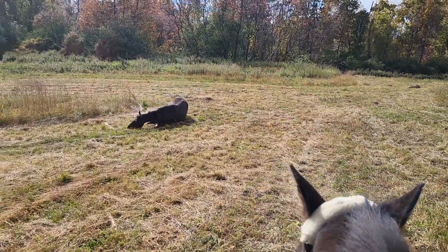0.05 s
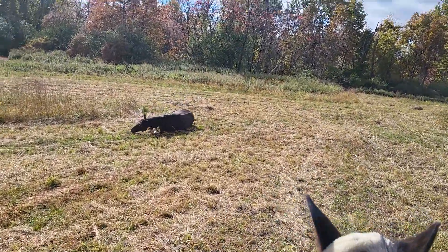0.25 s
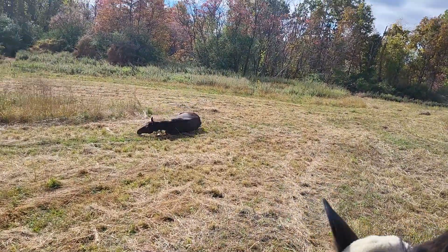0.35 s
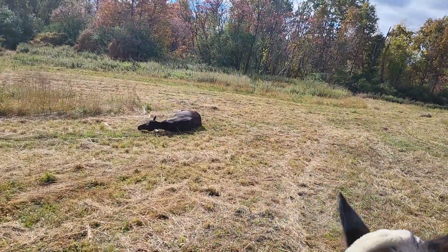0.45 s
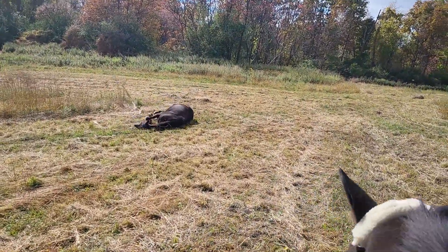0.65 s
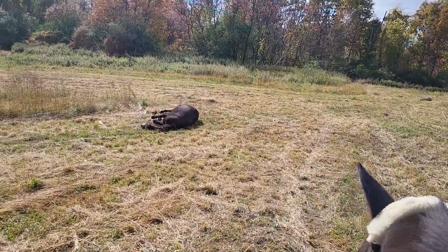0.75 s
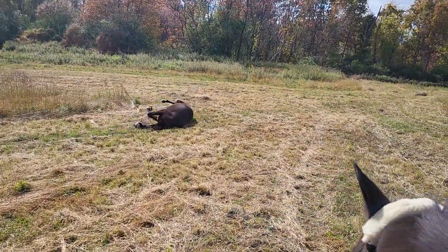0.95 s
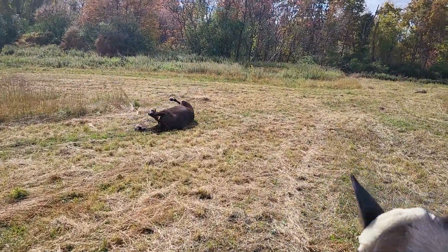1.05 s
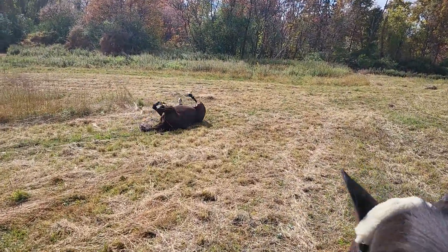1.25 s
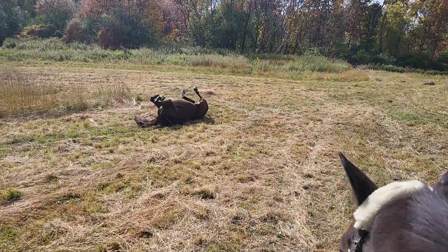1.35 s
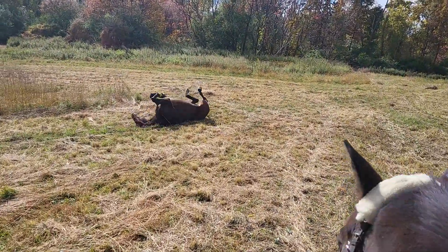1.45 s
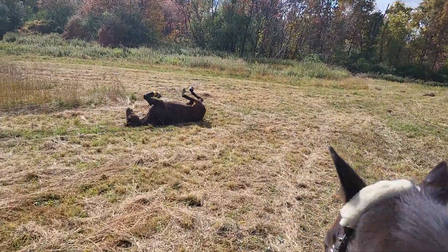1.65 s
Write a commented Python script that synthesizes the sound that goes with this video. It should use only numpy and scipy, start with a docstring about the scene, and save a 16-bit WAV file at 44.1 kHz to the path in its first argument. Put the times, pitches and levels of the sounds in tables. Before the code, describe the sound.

Low wind buffeting over a phone in an open field, with grass swish, ticks and dull hoof thumps

```python
"""Riding through dry grass

A phone in a rider's hand, in an open mown field. Far hiss is shaped noise; crickets trill in short
falling whistles. Tack and stems tick as fast-dying modes, and dry grass swishes as patchy noise.
Hooves thump in low wobbling tones. Closest of all, wind buffets each microphone port on its own,
as low noise with a rumble above it and a few strong single blows."""
import sys
import numpy as np
from scipy import signal
from scipy.fft import rfft, irfft
from scipy.io import wavfile
from scipy.ndimage import uniform_filter1d

SR = 44100
rng = np.random.default_rng(int(sys.argv[2]) if len(sys.argv) > 2 else 0)


def amplitude_ratio(level_db):
    """Convert a level in decibels to the matching linear amplitude (field) ratio."""
    exponent = np.asarray(level_db, float) / 20
    return 10 ** exponent


def materialize(psi):
    """Save the field psi as 16-bit PCM at rate SR to the path in sys.argv[1].

    A 1-D psi becomes a single channel; in a 2-D psi each row is a channel.
    """
    bounded = np.clip(np.atleast_2d(psi).T, -1, 1)
    quanta = np.round(bounded * 32767).astype(np.int16)
    wavfile.write(sys.argv[1], SR, quanta)


N = 74970
T = np.arange(N) / SR  # seconds


def evened(x):
    """Scales a signal to unit rms."""
    return x / np.sqrt(np.mean(x ** 2) + 1e-20)


def read(points, hz):
    """Reads a spectrum at given frequencies, on a log-frequency axis."""
    f, value = np.transpose(points)
    return np.interp(np.log(hz + 1), np.log(f + 1), value)


def columns(rows):
    """Draws each column after the first as a curve over time."""
    rows = np.array(rows, float)
    return [np.interp(T, rows[:, 0], c) for c in rows.T[1:]]


def sides(pan_db):
    """Left and right gains for a left-minus-right level in dB."""
    return np.array([amplitude_ratio(pan_db / 2), amplitude_ratio(-pan_db / 2)])


def colour(x, points):
    """Filters by a spectrum in dB, then brings the result to unit rms."""
    hz = np.fft.rfftfreq(N, 1 / SR)
    return evened(irfft(rfft(x) * amplitude_ratio(read(points, hz)), N))


def add(mix, s, sound):
    """Lays a sound into both channels from s seconds on."""
    part = mix[:, round(s * SR):][:, :sound.shape[1]]
    part += sound[:, :part.shape[1]]


# Spectrum of the far hiss across the field. Each row: frequency in Hz, density in dB per Hz.
FIELD_SPECTRUM = [(180, -58), (300, 1), (343, -8), (885, -20.5), (978, -14.5), (1360, -54), (1900, -21.5),
                  (2740, -21), (3760, -17.5), (6520, -18.5), (7690, -8.5), (9710, -35.5), (16000, -20)]
# The top treble at the phone. Each row: time in seconds, level in dB, left minus right in dB.
TOP_TREBLE = [(0.0, -58, -11.5), (0.032, -60.5, -15), (0.126, -56, -8), (0.374, -68, -10),
              (0.524, -62.5, -11), (0.766, -62.5, -4), (0.866, -59.5, -2.0), (1.216, -67.5, -8.5),
              (1.272, -70.5, -17), (1.42, -59.5, -6), (1.452, -71, -8), (1.7, -65.5, -12)]
FIELD_DB = -62


def field():
    """Far steady hiss and a top treble that comes and goes: noise shaped apart for each side."""
    air_db, pan_db = columns(TOP_TREBLE)
    top_spectrum = [(6000, -74), (8500, -4), (10500, -3.5), (13000, 1), (16000, 1.5)]  # (Hz, dB per Hz)
    top = colour(rng.standard_normal((2, N)), top_spectrum)
    hiss = colour(rng.standard_normal((2, N)), FIELD_SPECTRUM)
    return amplitude_ratio(FIELD_DB) * hiss + amplitude_ratio(air_db) * sides(pan_db) * top


# Crickets heard one by one. Each row: chirps per second, first centre in seconds, length in seconds,
# top pitch in Hz, fall in Hz.
CRICKETS = [(15.25, .053, .018, 7640, 450), (17.08, .015, .02, 8050, 350), (18.6, .035, .024, 7950, 950),
            (17.3, .050, .024, 8720, 250), (16.9, .040, .022, 7580, 350)]
# The same crickets, before and after the phone turns away. Each row: early dB, late dB,
# left minus right in dB; levels relative to each other within the chorus.
CRICKETS_DB = [(0, 5, 0), (-1, -8, 0), (-2, -2, 2), (-8, -15, -8), (0, -8, -4)]
# The whole chorus at the phone. Each row: time in seconds, level in dB, left minus right in dB.
CHORUS = [(0.0, -57.5, -1), (0.202, -59.5, 1.5), (0.492, -59.5, -2.5), (0.738, -67, -2), (1.684, -66, -1.5),
          (1.7, -70, -1.5)]
CHIRP_JITTER_DB, CHIRP_JITTER_S = 1.8, .001  # from chirp to chirp, standard deviations
CHORUS_WASH_DB = -5  # the blurred band, relative to the chorus
TURN_S = .62  # the phone turns away
CHIRP_FUZZ, FUZZ_S = .45, .002  # depth of the shimmer in a chirp, and its smoothing time


def crickets():
    """Each chirp is a short, shimmering, falling whistle; far ones blur into a band of noise."""
    level_db, pan_db = columns(CHORUS)
    # (Hz, dB per Hz)
    band = [(5500, -96), (6900, -11), (7450, -2), (8050, -18), (8600, -18), (10000, -85)]
    out = amplitude_ratio(CHORUS_WASH_DB) * colour(rng.standard_normal((2, N)), band)
    for (rate, first, length, top_hz, fall_hz), (early_db, late_db, own_db) in zip(CRICKETS, CRICKETS_DB):
        count = np.round((T - first) * rate)  # which chirp is nearest
        late, loud = rng.standard_normal((50, 2))[count.astype(int)].T
        since_centre = T - first - count / rate - CHIRP_JITTER_S * late
        progress = np.clip(since_centre / length + .5, 0, 1)  # 0 to 1 through the chirp
        # the two ports hear the whistle .22 of a cycle apart
        port_turns = np.array([[0], [.22]])
        turns = np.cumsum(top_hz - fall_hz * progress ** 2.5) / SR + rng.random() + port_turns
        fuzz_noise = rng.standard_normal((2, 2, N))
        re, im = evened(uniform_filter1d(fuzz_noise, max(round(FUZZ_S * SR), 2)))
        tone = ((1 + CHIRP_FUZZ * (re + 1j * im)) * np.exp(2j * np.pi * turns)).real
        chirp_db = np.where(T < TURN_S, early_db, late_db) + CHIRP_JITTER_DB * loud
        out += amplitude_ratio(chirp_db) * sides(own_db)[:, None] * np.sin(np.pi * progress) * tone * 2
    return out * amplitude_ratio(level_db) * sides(pan_db)


# Ticks of tack and stems near the phone. Each row: start in seconds, level of the main mode in dB,
# left minus right in dB, low mode relative to main in dB, two high modes relative to main in dB.
TICKS = [(0.532, -55, -19, -29, -14), (0.7104, -42, 4, -15, 5), (0.834, -45, -2.0, 2, -14),
         (0.991, -52, -2, -1, 5), (1.047, -37.5, -7, -37, -22), (1.078, -48, 3, 4, -12),
         (1.1, -37, -1.5, -19, -14), (1.1455, -41, 8, -8, -14), (1.1497, -31.5, -4.5, -8, -13.5),
         (1.171, -53, -2, -20, 5), (1.2183, -52.5, 4, -1, -15), (1.337, -38, -8, -27, -15),
         (1.3929, -21.5, -5.5, -30.5, -17), (1.4146, -36, -6, -15, -3), (1.6015, -37, -3, -20, -6)]
# Modes of a tick: low, main, two high. Each row: middle pitch in Hz, time to fall 60 dB in seconds.
TICK_MODES = [(1800, .006), (5000, .0021), (8800, .0016), (13200, .002)]
# Faint rings. Each row: start in seconds, pitch in Hz, time to fall 60 dB in seconds.
RINGS = [(1.079, 1950, .08), (1.153, 1400, .22)]
RING_DB = -65.5


def ticks():
    """Short clicks excite a few fast-dying modes; faint rings are single decaying tones."""
    out, t = np.zeros((2, N)), np.arange(600) / SR
    onset = np.minimum(t / 0.00028, 1)
    for s, db, pan_db, low_db, high_db in TICKS:
        detune = rng.uniform(.95, 1.05, len(TICK_MODES))
        modes = 0
        for (hz, t60), mode_db, k in zip(TICK_MODES, (low_db, 0, high_db, high_db), detune):
            modes = modes + amplitude_ratio(mode_db - 60 * t / t60) * np.sin(2 * np.pi * hz * k * t)
        add(out, s, amplitude_ratio(db) * sides(pan_db)[:, None] * onset * modes)
    for s, hz, t60 in RINGS:
        decay = amplitude_ratio(RING_DB - 60 * abs(T - s) / t60)
        out += (T > s) * decay * np.sin(2 * np.pi * hz * T)
    return out


PATCHY_DB, FLICKER_DB = 2, .8  # patches in time and pitch, and flicker of all pitches at once
CRACKLES_PER_S, CRACKLE_DB = 500, -8  # level relative to the noise
SPREAD_DB = 5  # mean of the random dB added to each crackle


def patchy():
    """Noise with drifting patches, flicker and small crackles."""
    size = amplitude_ratio(SPREAD_DB * np.minimum(rng.exponential(1, N), 4))
    size = size * (rng.random(N) < CRACKLES_PER_S / SR)
    crackles = evened(size * rng.choice([-1, 1], N))
    x = rng.standard_normal(N) + amplitude_ratio(CRACKLE_DB) * crackles
    z = signal.stft(x, nperseg=256, noverlap=192)[2]
    across_pitch = uniform_filter1d(rng.standard_normal(z.shape), 4, axis=0)
    patch = evened(uniform_filter1d(across_pitch, 40, axis=1))
    flicker = evened(uniform_filter1d(rng.standard_normal(z.shape[1]), 8))
    gain = amplitude_ratio(PATCHY_DB * patch + FLICKER_DB * flicker)
    return signal.istft(z * gain, nperseg=256, noverlap=192)[1][:N]


# How alike the two ports hear the grass. Each row: frequency in Hz, likeness from 0 to 1.
LIKENESS = [(500, 1), (1200, 0.58), (2400, 0.57), (4400, 0.57)]
# Phase lead of the left port. Each row: frequency in Hz, lead in radians.
LEFT_LEAD = [(0, -2), (780, -0.9), (2330, -1.1), (3360, 5.5), (4740, 8), (6290, 8), (6550, 7), (7060, 11),
             (7840, 10), (9130, 10.5), (11500, 9.5), (12400, 13), (13900, 8.5), (16500, 17)]


def pair(source):
    """One source heard by two ports: partly alike, with a phase lead on the left."""
    hz = np.fft.rfftfreq(N, 1 / SR)
    same = read(LIKENESS, hz)
    a, b = rfft(source()), rfft(source())
    left = irfft(a * np.exp(1j * read(LEFT_LEAD, hz)), N)
    right = irfft(same * a + np.sqrt(1 - same ** 2) * b, N)
    return np.array([left, right])


# Grass rustle below the phone. Each row: time in seconds, level in dB, left minus right in dB,
# low part relative to the bright part in dB.
RUSTLE = [(0, -50.5, -12, -1.5), (.03, -53.5, -8, -3.5), (.09, -53, -6, 0), (.15, -52, -8, -1.5),
          (.215, -56, -8, 3.5), (.235, -58.5, -9, 2), (.32, -60.5, -4, 0), (.41, -66, -13.5, -3.5),
          (.5, -62.5, -7.5, 3), (.54, -55, -5.5, -2), (.6, -63, -5, 2.5), (.66, -63.5, -3, -0.5),
          (.72, -62, -2, -5.5), (.76, -61, 0.5, -8.5), (.82, -56.5, -1.5, -5.5), (.84, -50.5, -2, -5.5),
          (.92, -53.5, -1.5, -6.5), (.985, -54.5, -2, -6), (1.01, -62, -1, -5.5), (1.07, -57.5, -2, -7),
          (1.12, -64, -1.5, -2), (1.25, -72.5, -5.5, -1), (1.36, -61.5, 0, -5), (1.42, -61.5, 2, -9),
          (1.47, -74.5, -12, -2.5), (1.56, -68.5, -9, -6), (1.61, -65, -3, -5), (1.7, -82, 2, 13)]
# Bright part of the rustle. Each row: frequency in Hz, density in dB per Hz.
GRASS_BRIGHT = [(1530, -63), (2600, -17.5), (3170, -5.5), (3700, -3), (5500, 1), (6600, -3), (7400, -8),
                (9050, -12.5), (13000, -9.5), (15500, -11)]
# Low part of the rustle. Each row: frequency in Hz, density in dB per Hz.
GRASS_LOW = [(350, 1), (600, -1.5), (759, -1), (994, -1.5), (1660, -2.5), (1800, 0), (3000, -17),
             (3900, -56), (6600, -120)]
LOW_SIDEWAYS = 1.2  # the low rustle leans further to its side


def grass():
    """Dry stems swish under moving legs: patchy noise in a bright and a low colour."""
    level_db, pan_db, low_db = columns(RUSTLE)
    x = pair(patchy)
    bright = sides(pan_db) * colour(x, GRASS_BRIGHT)
    low = amplitude_ratio(low_db) * sides(LOW_SIDEWAYS * pan_db) * colour(x, GRASS_LOW)
    return amplitude_ratio(level_db) * (bright + low)


# Hooves below the rider. Each row: start in seconds, length in seconds, pitch in Hz.
HOOVES = [(.845, .08, 65), (.96, .04, 70), (1.045, .05, 68), (1.34, .05, 75), (1.395, .035, 90),
          (1.565, .08, 70)]
# Their levels before the low cut. Each row: thump in dB, knock relative to the thump in dB.
HOOVES_DB = [(-31, -30), (-46, -18), (-28, -24), (-36, -28), (-48, 0), (-62, 5)]
PITCH_WOBBLE_HZ = 22.1  # standard deviation
KNOCK_BAND_HZ = [262.6, 471.468]


def hooves():
    """A hoof on the ground: a low tone of wobbling pitch with a noisy knock, alike on both ports."""
    out = np.zeros((2, N))
    b, a = signal.butter(2, KNOCK_BAND_HZ, "bandpass", fs=SR)
    for (s, length, hz), (db, knock_db) in zip(HOOVES, HOOVES_DB):
        t = np.arange(0, length, 1 / SR)
        drift = evened(uniform_filter1d(rng.standard_normal(SR // 4), 400))[:len(t)]
        turns = np.cumsum(hz + PITCH_WOBBLE_HZ * drift) / SR + rng.random()
        body = np.sin(2 * np.pi * turns)
        knock = evened(signal.lfilter(b, a, rng.standard_normal(SR // 4)))[:len(t)]
        swell = np.sin(np.pi * t / length)
        add(out, s, amplitude_ratio(db) * swell * (body + amplitude_ratio(knock_db) * knock) * np.ones((2, 1)))
    return out


# The strongest single blows of wind, and thumps that reach both ports. Each row: centre in seconds,
# pitch in Hz, half width in seconds, share of power on the left port from 0 to 1.
BLOWS = [(.229, 75, .011, 1), (.265, 70, .009, 0), (.303, 120, .0022, 0), (.4735, 130, .004, .4),
         (.514, 75, .008, 0), (.536, 130, .0021, 0), (.568, 100, .006, 1), (.5795, 72, .016, 0),
         (1.406, 190, .0018, .5)]
# Peak level of each of these, in dB before the low cut.
BLOWS_DB = [-21, -10, -8, -17, -14, -7, -18, -6, -23]


def blows():
    """Single pressure dips: an inverted cosine under a narrow bell, shared between the ports."""
    out = np.zeros((2, N))
    for (s, hz, half, left), db in zip(BLOWS, BLOWS_DB):
        share = np.sqrt([[left], [1 - left]])
        bell = 1 / (1 + ((T - s) / half) ** 2 / 2) ** 2
        out -= amplitude_ratio(db) * share * np.cos(2 * np.pi * hz * (T - s)) * bell
    return out


LOW_CUT_HZ = 55


def knocks():
    """Hooves and blows together; the microphone drops their deepest part."""
    b, a = signal.butter(2, LOW_CUT_HZ, "highpass", fs=SR)
    return signal.filtfilt(b, a, hooves() + blows())


# Wind on the left port. Each row: time in seconds, buffeting level in dB,
# rumble relative to the buffeting in dB.
WIND_LEFT = [(0.0, -34, -21), (0.04, -42.5, 1), (0.085, -48, -22), (0.105, -38, -17), (0.175, -40, -18),
             (0.2, -35, -10), (0.22, -38, -12), (0.229, -28.5, -13), (0.289, -37, -22), (0.334, -28, -21),
             (0.379, -40, -17.5), (0.474, -25, -11.5), (0.544, -40.5, -22), (0.569, -30, -5),
             (0.614, -29.5, -21.5), (0.723, -40.5, -11), (0.758, -50.5, -18), (0.868, -30.5, -14.5),
             (0.918, -55, -34), (0.948, -59, -12), (1.023, -48.5, -6.5), (1.068, -25.5, -11),
             (1.107, -63, -29), (1.162, -44.5, -18), (1.277, -44.5, -15), (1.402, -31, -4.5),
             (1.492, -33.5, -15), (1.532, -43, -22.5), (1.601, -38.5, -24), (1.696, -60.5, -25)]
# Wind on the right port. Each row: time in seconds, buffeting level in dB,
# rumble relative to the buffeting in dB.
WIND_RIGHT = [(0.0, -19.5, -7.5), (0.033, -31.5, -16), (0.13, -26, -28.5), (0.17, -29, -10.5),
              (0.218, -23.5, -8), (0.243, -30.5, -56), (0.261, -19.5, -14.5), (0.312, -16.5, -19.5),
              (0.346, -41.5, -11.5), (0.423, -31.5, -16.5), (0.445, -25, -10.5), (0.547, -23.5, -7),
              (0.563, -20, 0.5), (0.598, -20.5, -7.5), (0.62, -32.5, -9), (0.828, -81, -1),
              (0.864, -30, -32), (0.892, -36.5, -10), (0.929, -40.5, -15), (0.948, -78, -18),
              (0.978, -40.5, -24), (1.023, -77, 13), (1.073, -44, -2), (1.097, -39, -6), (1.118, -85, -19),
              (1.252, -44, -9), (1.322, -47, -5), (1.406, -31, -3), (1.437, -45, 1), (1.477, -34, -15),
              (1.54, -60, 2), (1.696, -82, -22)]
# Buffeting on the left port. Each row: frequency in Hz, density in dB per Hz.
BUFFET_LEFT = [(20, -2.5), (45, 4.5), (63, 13), (86, 9), (119, 9.5), (160, -10), (220, -50), (400, -100)]
# Buffeting on the right port. Each row: frequency in Hz, density in dB per Hz.
BUFFET_RIGHT = [(20, 2), (40, 7), (56, 20), (78, 9), (119, 4.5), (160, -7.5), (220, -37), (400, -100)]
# Rougher rumble on either port. Each row: frequency in Hz, density in dB per Hz.
RUMBLE = [(90, -13), (156, 2.5), (236, -6), (305, -14.5), (420, -20.5), (615, -34.5), (1200, -48),
          (2000, -65), (4000, -120)]
STEADY_S = 0.045  # time over which the buffeting is held to its level


def port_wind(rows, buffet):
    """Lumpy low noise, held near its level, and a rougher rumble above it."""
    level_db, rumble_db = columns(rows)
    low = colour(rng.standard_normal(N), buffet)
    rumble = colour(rng.standard_normal(N), RUMBLE)
    power = uniform_filter1d(np.abs(signal.hilbert(low)) ** 2, round(STEADY_S * SR))
    low = evened(low / np.sqrt(abs(power) + 0.023))
    return amplitude_ratio(level_db) * (low + amplitude_ratio(rumble_db) * rumble)


def wind():
    """Air buffets each microphone port on its own, so the two noises are unrelated."""
    return np.array([port_wind(WIND_LEFT, BUFFET_LEFT), port_wind(WIND_RIGHT, BUFFET_RIGHT)])


def scene():
    """Everything in the field, from the far hiss to the wind at the ports."""
    return field() + crickets() + ticks() + grass() + knocks() + wind()


def band_limit(x):
    """A steep low-pass at the top of the band."""
    return signal.sosfilt(signal.butter(12, 15910, fs=SR, output="sos"), x)


def record(dry):
    """Takes the field's sound as the finished mix."""
    return band_limit(dry)


dry = scene()
out = record(dry)
materialize(out)
```